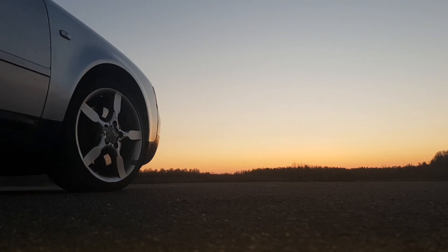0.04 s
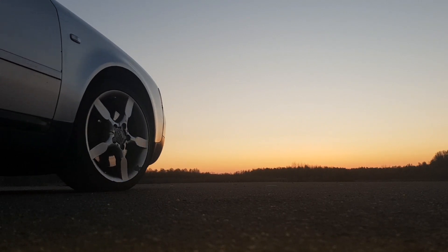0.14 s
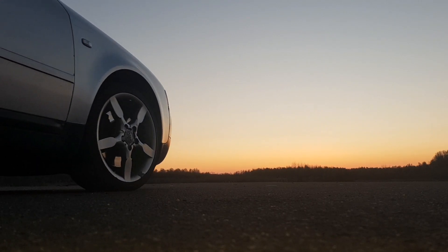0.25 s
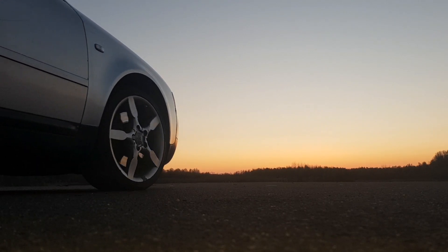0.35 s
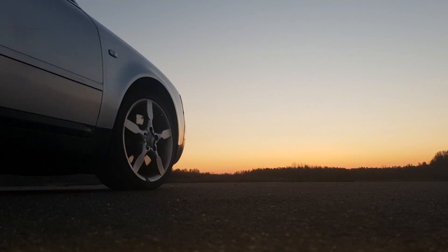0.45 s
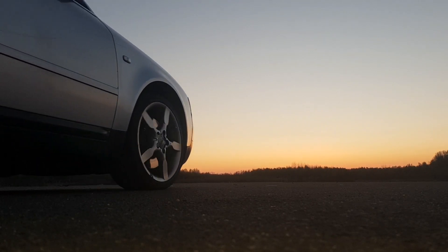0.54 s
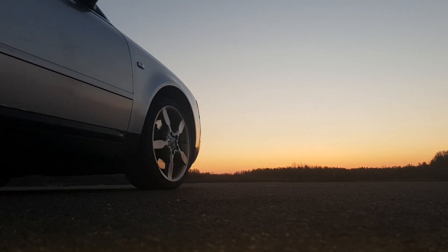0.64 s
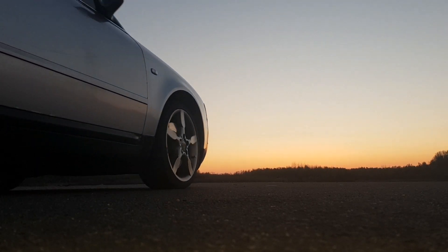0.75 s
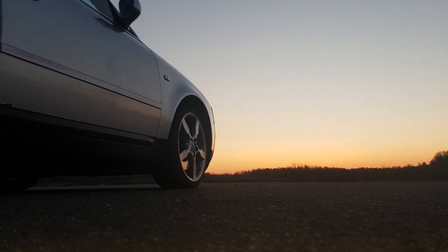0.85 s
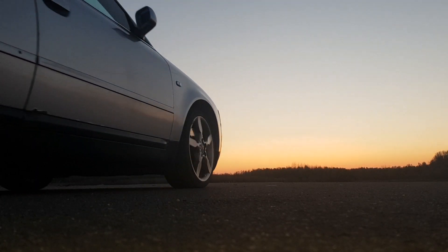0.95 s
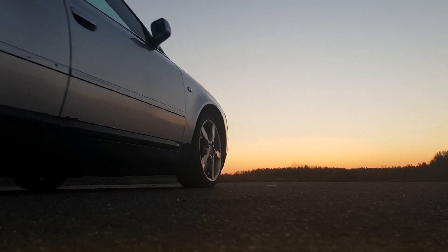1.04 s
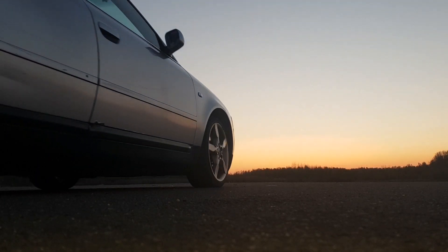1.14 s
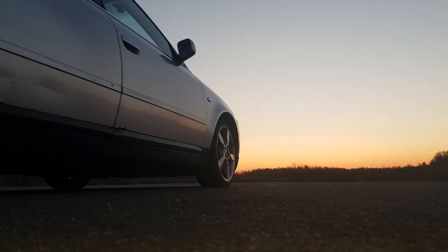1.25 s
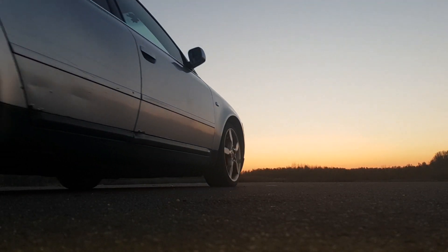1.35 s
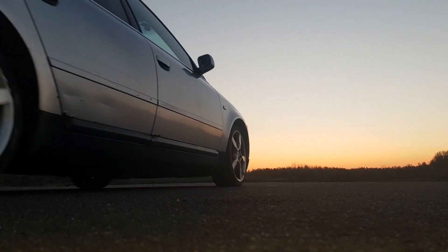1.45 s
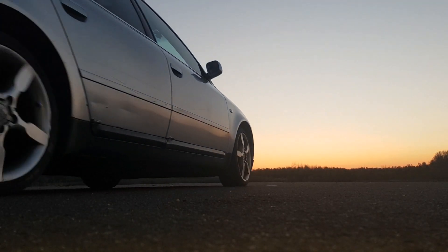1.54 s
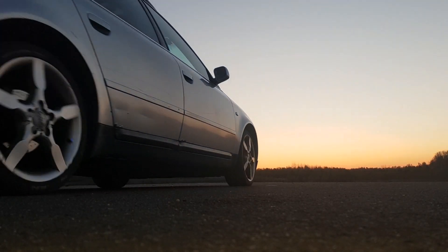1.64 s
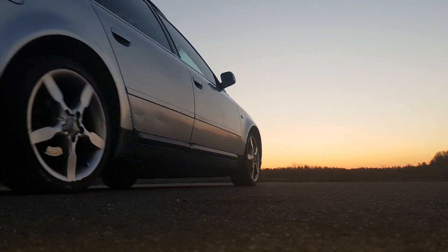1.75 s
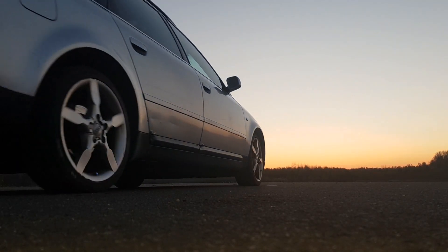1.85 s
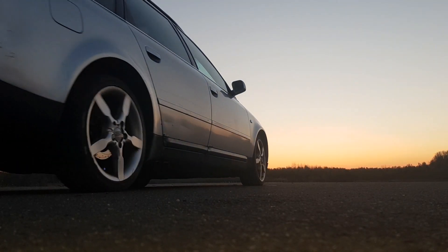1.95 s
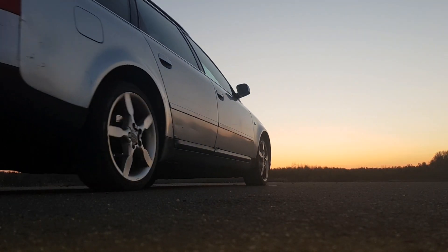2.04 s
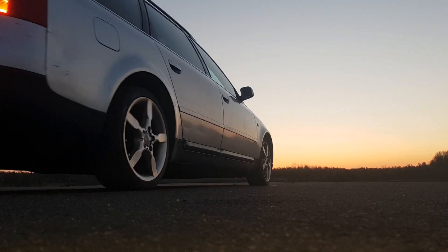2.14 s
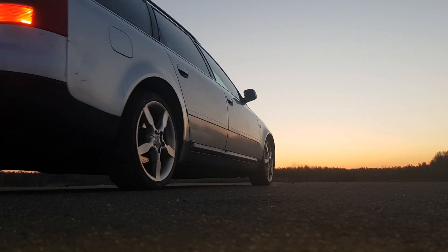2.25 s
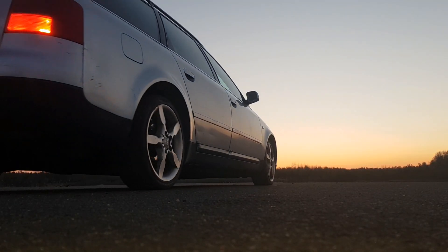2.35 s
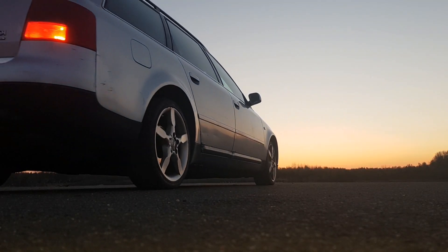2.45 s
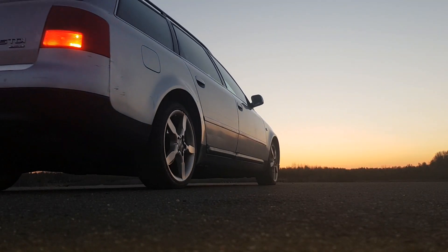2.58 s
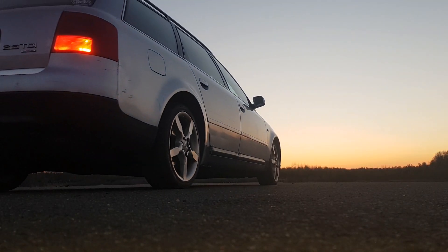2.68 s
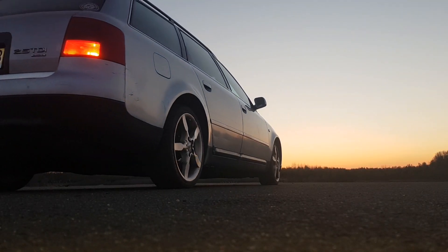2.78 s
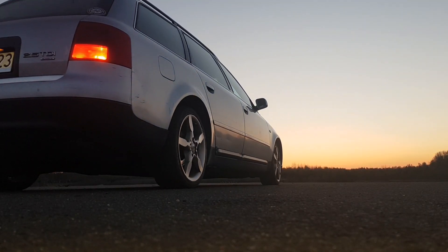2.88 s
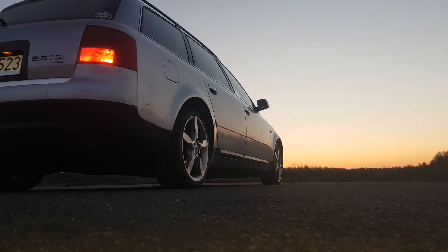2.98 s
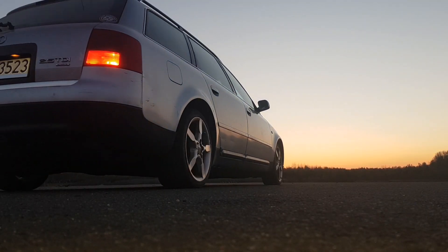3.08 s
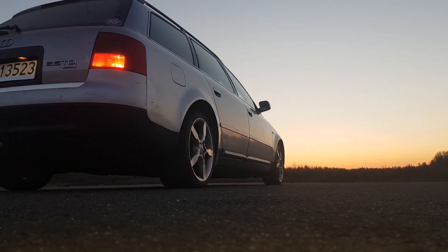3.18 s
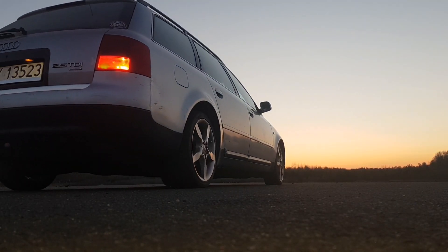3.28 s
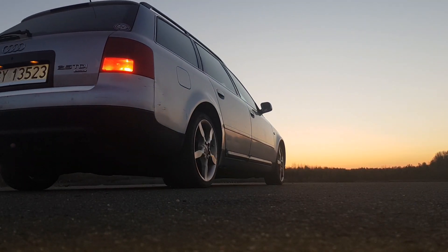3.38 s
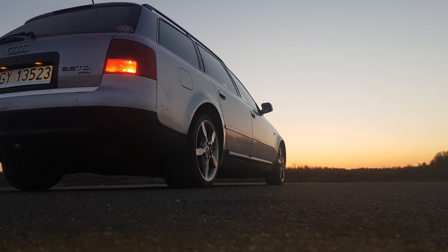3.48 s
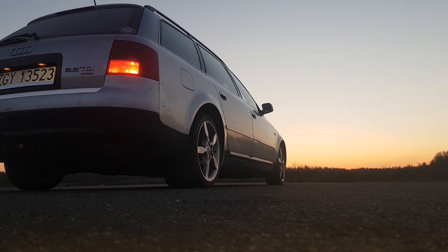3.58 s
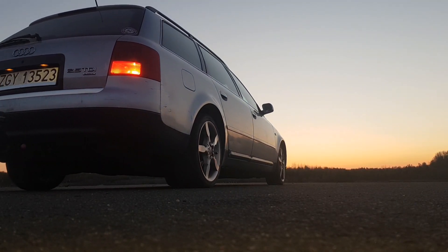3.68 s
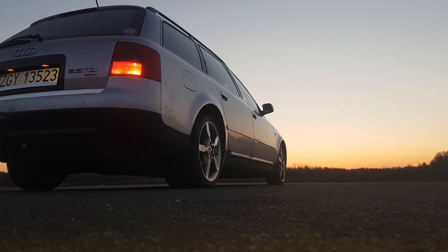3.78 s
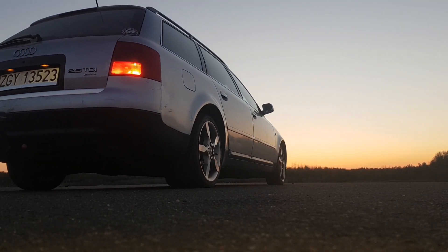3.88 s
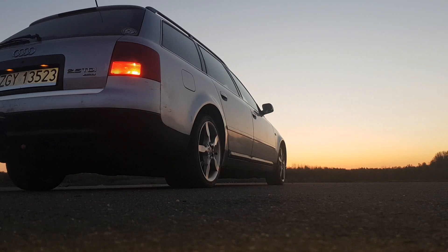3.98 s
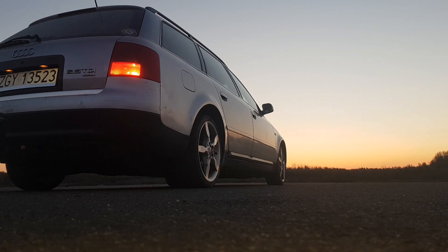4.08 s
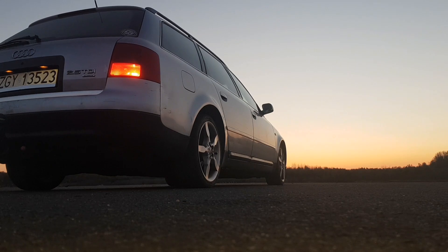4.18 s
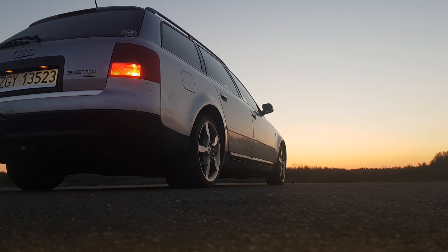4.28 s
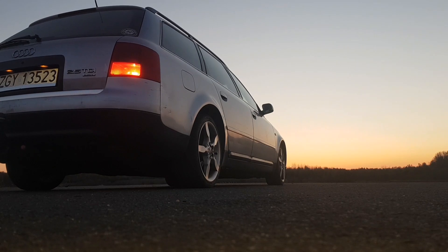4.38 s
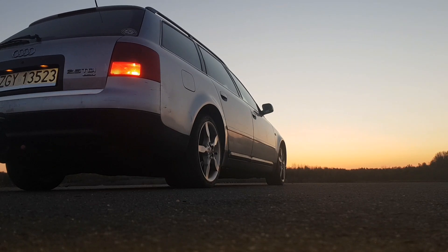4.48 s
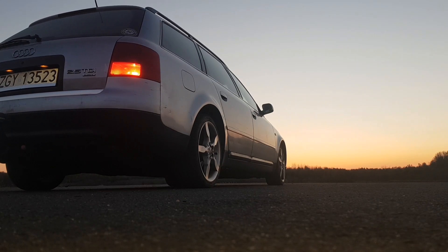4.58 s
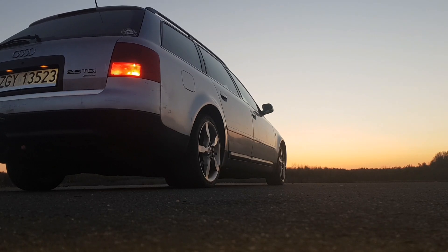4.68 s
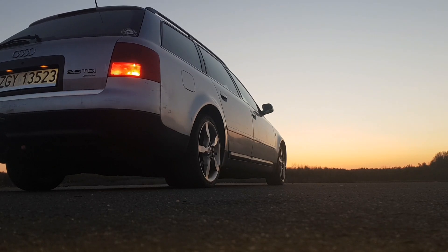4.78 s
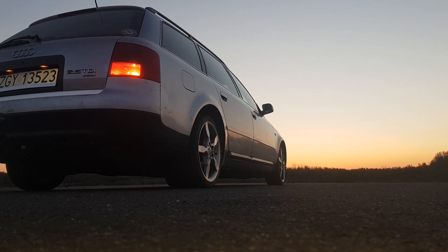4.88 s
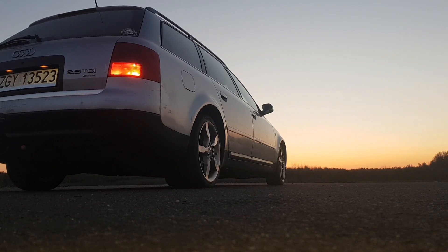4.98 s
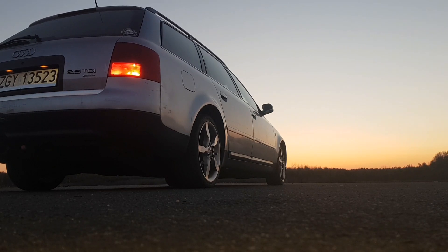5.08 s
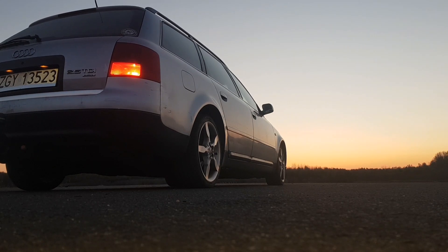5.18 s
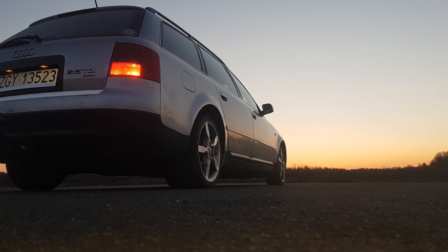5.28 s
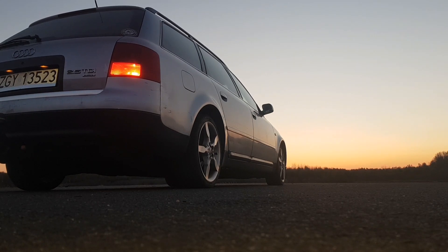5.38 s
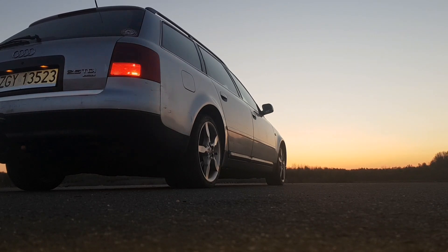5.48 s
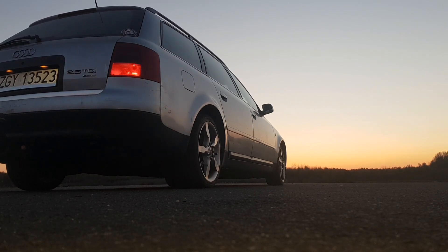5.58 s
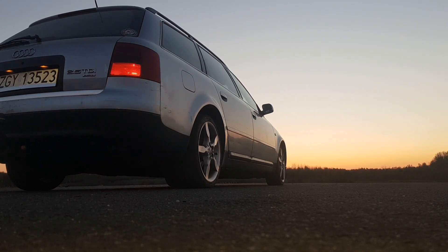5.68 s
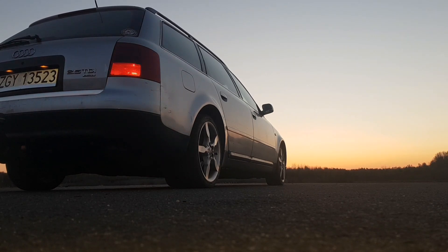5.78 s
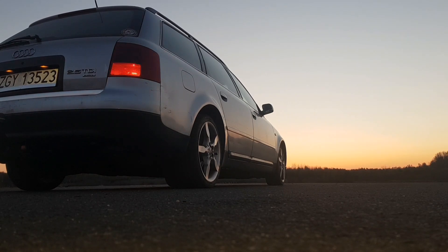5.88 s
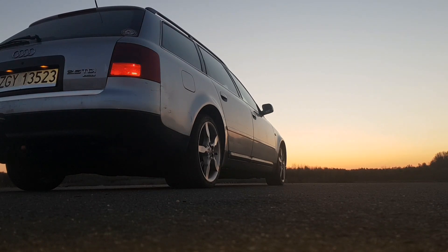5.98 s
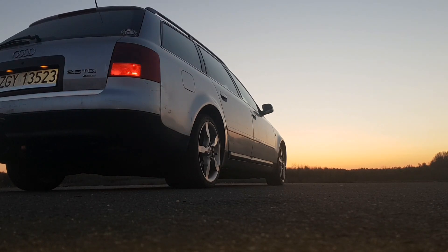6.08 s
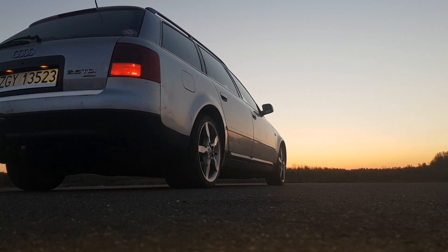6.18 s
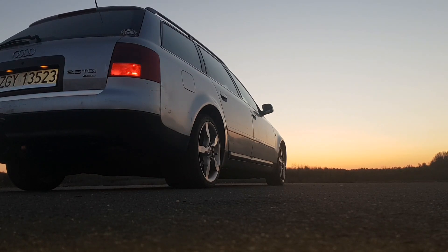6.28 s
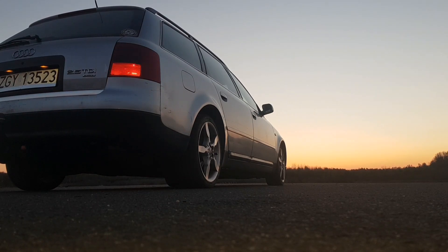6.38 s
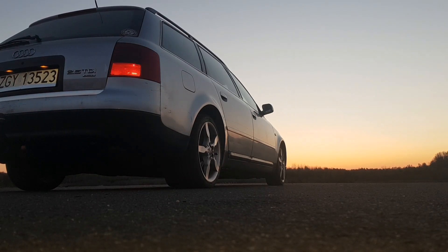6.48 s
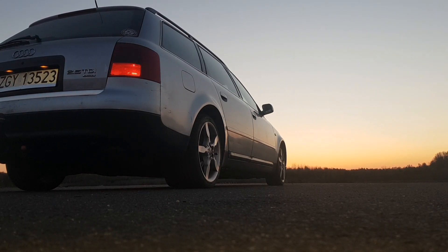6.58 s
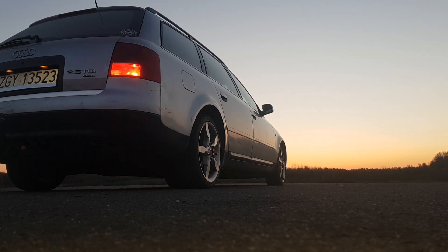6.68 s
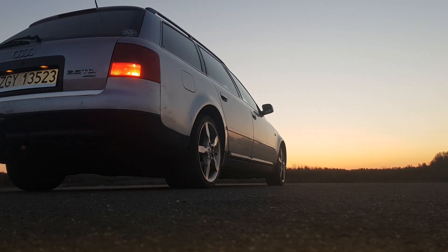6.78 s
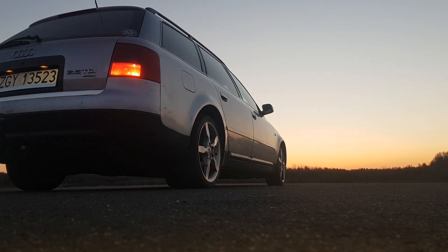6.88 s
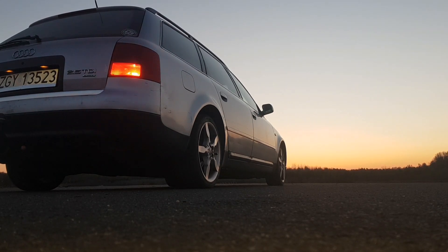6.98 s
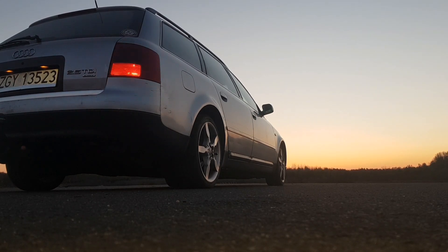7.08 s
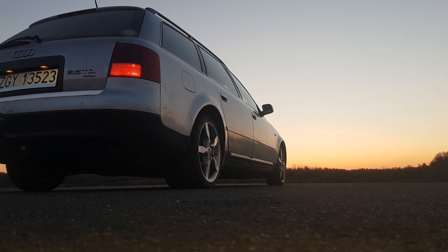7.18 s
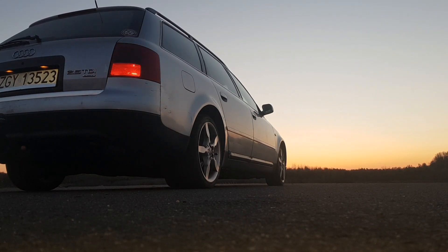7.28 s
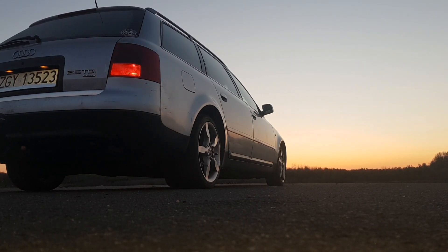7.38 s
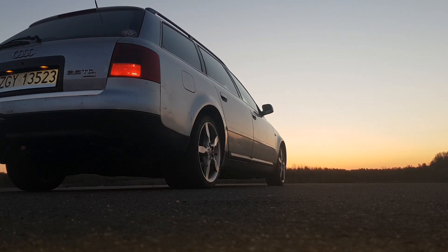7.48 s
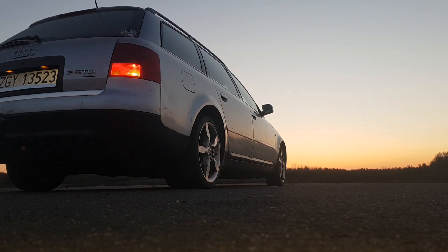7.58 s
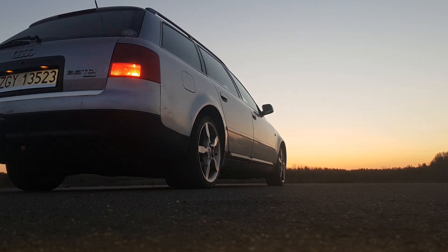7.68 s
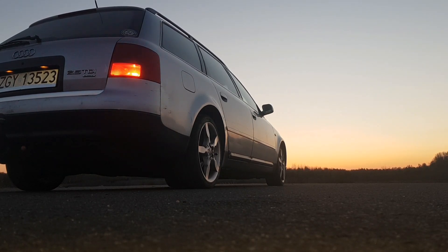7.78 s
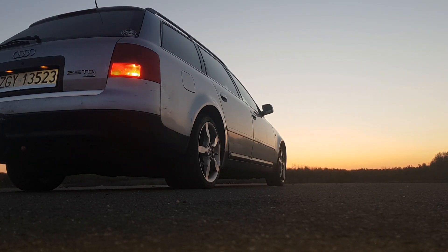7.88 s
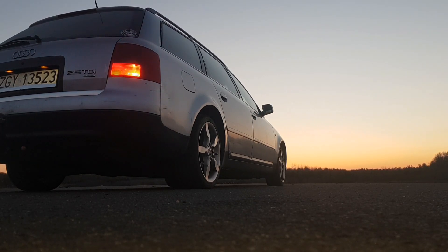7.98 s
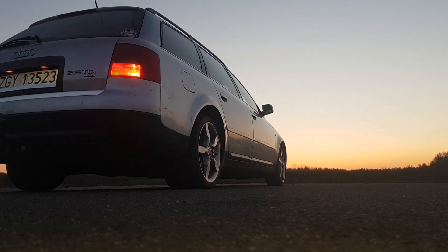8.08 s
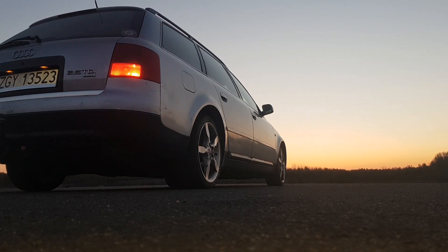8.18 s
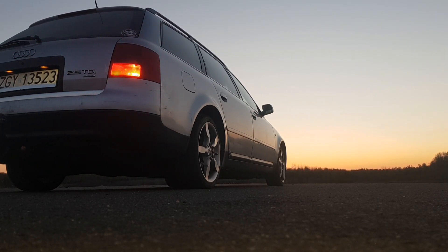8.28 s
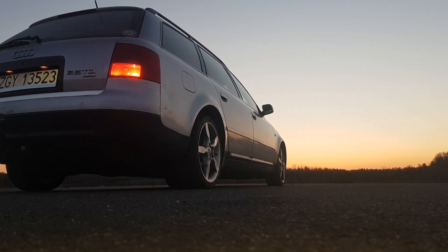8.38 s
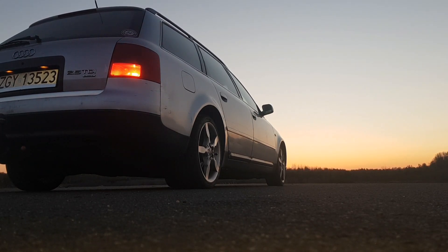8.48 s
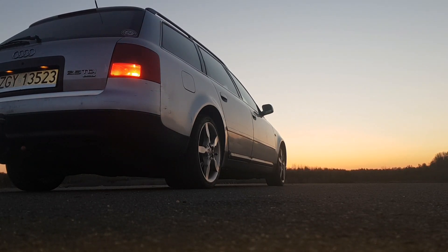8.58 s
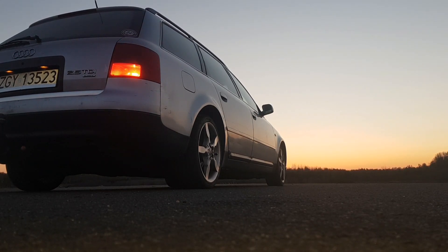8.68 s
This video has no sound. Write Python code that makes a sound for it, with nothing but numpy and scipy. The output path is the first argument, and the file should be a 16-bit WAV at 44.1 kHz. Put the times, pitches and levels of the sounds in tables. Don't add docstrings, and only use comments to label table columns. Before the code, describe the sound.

Outdoors on open tarmac, heard in stereo from a phone near the ground: a diesel engine under load drones loudly with hard clatter, thin whine and hissing tyres, then backs off and drops in pitch. A steady uneven idle follows, low exhaust throb with gas roar and rattling injectors, quieter as the car stops further off. One brief stumble, then a final rise in revs.

```python
import sys
import numpy as np
from scipy import signal
from scipy.fft import rfft, irfft, next_fast_len
from scipy.io import wavfile

SR = 44100
rng = np.random.default_rng(int(sys.argv[2]) if len(sys.argv) > 2 else 0)


def how_loud(loudness_db):
    steps = np.asarray(loudness_db, float) / 20
    return 10 ** steps


def master_out(mix):
    frames = np.transpose(np.atleast_2d(mix))
    ceiling = np.clip(frames, -1, 1)
    pcm = np.round(ceiling * 32767).astype(np.int16)
    wavfile.write(sys.argv[1], SR, pcm)


N = 385434
TIME = np.arange(N) / SR
SIZE = next_fast_len(N + SR)
HZ = np.maximum(np.arange(SIZE // 2 + 1) * SR / SIZE, 1)
SIDE = np.array([[1], [-1]])

# time in seconds, rate in firings per s.
CRANK = [(0, 54.13), (.3, 55.21), (.55, 54.51), (.88, 52.82), (1.22, 53.08), (1.6, 41.25), (1.75, 37.94),
         (2, 38.46), (2.45, 39.26), (3.6, 39.05), (6.4, 39.05), (7, 38.99), (8.43, 38.95), (8.65, 43.69),
         (8.74, 51)]
# idle strength in dB, idle pipe lag in ms, loaded strength in dB, loaded pipe lag in ms.
CYLINDERS = [(3.1, 6.14, 3.1, 7.26), (-0.6, 5.93, -6.1, 8.11), (0.7, 5.87, 2.0, 7.04),
             (-2.8, 5.59, -1.6, 7.7), (1.5, 5.41, 3.0, 7.07), (-3.9, 5.16, -4.9, 9.1)]
# centre in Hz, width in Hz, level in dB, polarity.
PIPE_IDLE = [(97.7, 44.9, -48, -1), (108, 11.02, -40, 1), (169.94, 10.5, -48, 1), (199.1, 6, -63, 1),
             (253, 13.4, -67.5, 1)]
PIPE_LOAD = [(97, 69.6, -47.5, -1), (101.3, 15.2, -37, 1), (173.3, 78, -49.5, 1), (203, 17, -49.5, -1),
             (265, 77, -61.5, -1)]
# frequency in Hz, level in dB per Hz.
ROAR_IDLE = [(120, -9), (210, 2.5), (227, -10.5), (358, -6), (456, -9), (736, -10), (875, -16.5),
             (1100, -15.5), (1430, -42.5), (2420, -120)]
ROAR_LOAD = [(160, -25), (280, -10), (298, -2.5), (384, -2), (464, -7), (574, -1.5), (702, -10.5),
             (1020, -8.5), (1200, -11.5), (1560, -45), (2640, -120)]
CLATTER_IDLE = [(530, -34.5), (900, -12), (1350, -5), (1460, -9.5), (1600, -10), (3820, -19.5),
                (5150, -19.5), (6000, -27.5), (7210, -28), (9000, -42.5), (11700, -64.5), (19800, -120)]
CLATTER_LOAD = [(650, -29.5), (1100, -18.5), (1290, -14), (1420, -1), (1820, 4.5), (2410, -1.5), (3240, -3),
                (4410, -9), (4910, -13.5), (7160, -16.5), (9000, -30.5), (11700, -69.5), (19800, -120)]
# frequency in Hz, level in dB per Hz.
HISS = [(2940, -42), (5000, -21), (7200, -6.5), (8920, -4.5), (10900, -2.5), (13100, -1), (14500, -26.5)]
EVEN = [(1000, 0), (10000, 0)]
# centre in Hz, width in Hz, dB.
BLOCK = [(247.7, 37, 5.5), (330.6, 78, 1.5), (475.4, 64, -4), (626, 77, -4.5), (740, 123, -3.5),
         (928, 120, -8), (1156, 70, -4.5), (1254, 120, -6), (1465, 64, -4), (1614, 126, -6.5),
         (1960, 140, -12)]
COVERS = [(1650, 160, -7), (2050, 250, -8.5), (2430, 290, -3.5), (3200, 180, -17), (4220, 420, -5),
          (5240, 360, -7), (6920, 560, -8), (4250, 70, -2), (6985, 53, -1)]
# start in seconds, peak in dB, ring in Hz.
KNOCKS = [
    (0.245, -20.5, 1400),
    (1.953, -28, 1550),
    (2.108, -28.5, 1500),
    (4.873, -30, 1340),
]
STONE = [
    (1.8, -44.5, 6000),
]
INJECTOR_RINGS = [(0.094, -31, 3380), (0.1357, -26, 3050), (0.462, -14.5, 3200), (0.553, -29, 3070),
                  (0.5904, -20, 3570), (0.93, -19.5, 2930), (1.117, -25.5, 3120), (1.953, -37, 3070),
                  (2.4196, -37.5, 3140), (2.5702, -35.5, 3200), (2.7237, -37.5, 3220), (2.877, -40, 3150)]
# frequency in Hz, likeness 0-1.
LIKENESS = [(60, 0.73), (130, 1), (290, 0.93), (620, 0.87), (1360, 0.73), (2970, 0.48), (6470, 0.18),
            (14100, 0.02)]
# frequency in Hz, left over right in dB.
LEAN = [(60, 4), (370, -0.5), (1250, 0), (4200, -0.5), (7700, -5), (10000, 22)]
# idle dB, then dB added at pulling revs, under load, and with the bay alongside.
ROAR_LAW = (-40, 6, 4.5, 4)
CLATTER_LAW = (-43.5, 2, 3.5, 9)
RATTLE_LAW = (-55.5, 4.5, 3.5, 7)
WHINE_LAW = (-51, -3, -30, 8)
FAN_LAW = (-95.5, 26.5, 1, -5)
PAN_LAW = (1.52, .2, 0.42, 0.67)
BAY_SHARE = (0.01, 0.4, 0.31, 0.2)
INJECTOR_DB = [-1, 5.5, -5, 5, -7.5, 4.5]

IDLE_RATE, PULL_RATE, STUMBLE_SAG = 39.05, 54, 1.47
STUMBLE_S, GOVERNOR_PERIOD_S, GOVERNOR_SETTLE_S = 5.14, .37, .2
LIFT_S, LIFT_FADE_S, PIPE_FADE_S, REFUEL_S, REFUEL_FADE_S, PICKUP_S = 1.168, .047, .11, 1.628, .14, 8.5
STOP_S = 3.75
LOAD_DB, LOAD_CLOSE_DB, BOOM_DB, BOOM_CLOSE_DB, PICKUP_DB = -5, 7, 5.5, -8.5, -13
IDLE_DB, IDLE_CLOSE_DB, IDLE_PICKUP_DB, OVERRUN_DB = -5.5, 6.5, 1.5, -9
MISFIRE_S, MISFIRE_LENGTH_S, MISFIRE_DB, CATCH_DB, CATCH_S = 5.21, .056, -4.5, 6, .025
PUMP_DB, PUMP_HOLD_S, PUMP_FALL_DB_S, PUMP_FLOOR_DB = -23.5, .13, 200, -36.5
WHINE_HZ, BELT_GRIP = 1349, .8
INJECT_AT, INJECT_ADVANCE = .55, .15
RING_HZ, RING_SPREAD_HZ, RING_DB, RING_SCATTER_DB = 3148, 130, 3.5, 2
BAY_LAG_REST, BAY_LAG_CLOSE = 1, -12
INTAKE_HZ, INTAKE_WIDTH_HZ, INTAKE_DB = 391, 80, -39
TYRES_DB, TYRES_DB_PER_DECADE = -62, 34


def exhaust(count, fired, chance, now):
    loaded, boom, idling, hum = fuelling(now)
    idle_size, idle_ms, load_size, load_ms = np.array(CYLINDERS)[np.arange(len(fired)) % 6].T
    at = (fired * SR).astype(int)
    idle_gain = idling[at] * how_loud(idle_size + .5 * chance[0])
    load_gain = loaded[at] * how_loud(load_size + .8 * chance[0])
    idle = pulses(fired + idle_ms / 1000, SR / 2 * idle_gain)
    load = pulses(fired + load_ms / 1000, SR / 2 * load_gain)
    out = through(idle, sum(np.sign(sign) * how_loud(db) * mode(hz, w) for hz, w, db, sign in PIPE_IDLE))
    for k, (hz, w, db, sign) in enumerate(PIPE_LOAD):
        drive = load * boom if k < 2 else load
        out += through(drive, np.sign(sign) * how_loud(db) * mode(hz, w))
    out += hum * np.sqrt(2) * np.sin(4 * np.pi * count)
    pipe_end = -HZ ** 2 / (32 ** 2 - HZ ** 2 + 1.4j * HZ * 32)
    silencer = 1 / (1 + (HZ / 500) ** 6)
    return through(out, pipe_end * silencer)


def fuelling(now):
    close = now[3]
    load = 1 - ramp(LIFT_S, PIPE_FADE_S)
    loaded = load ** 2 * how_loud(LOAD_DB + LOAD_CLOSE_DB * close)
    loaded += how_loud(PICKUP_DB) * ramp(PICKUP_S, .36)
    boom = how_loud(BOOM_DB + BOOM_CLOSE_DB * close)
    refuel = ramp(REFUEL_S, REFUEL_FADE_S)
    caught = TIME - MISFIRE_S - MISFIRE_LENGTH_S
    idle_db = IDLE_DB + IDLE_CLOSE_DB * close + IDLE_PICKUP_DB * ramp(PICKUP_S, .025)
    idle_db += OVERRUN_DB * (1 - refuel)
    idle_db += MISFIRE_DB * (TIME > MISFIRE_S) * (caught < 0)
    idle_db += CATCH_DB * (caught > 0) * np.exp(-abs(caught) / CATCH_S)
    idling = (1 - load) ** 4 * how_loud(idle_db)
    hum_db = PUMP_DB - PUMP_FALL_DB_S * np.maximum(TIME - LIFT_S - PUMP_HOLD_S, 0)
    hum = ramp(LIFT_S, .05) ** 2 * (1 - refuel) * how_loud(np.maximum(hum_db, PUMP_FLOOR_DB))
    return loaded, boom, idling, hum


def gas_roar(count, fired, now, near):
    slugs_db = 2 * rng.standard_normal(len(fired) + 7)
    rush = noise(ROAR_IDLE, ROAR_LOAD, near) * puff(count, slugs_db, .9, .23, .17)
    return how_loud(law(ROAR_LAW, now)) * rush * flicker(5.5, .47)


def engine_bay(count, fired, chance, now, near):
    uneven_db = np.resize([0., 1.5, 1., .5, -.5, -1.], len(fired) + 7)
    uneven_db = uneven_db + .8 * rng.standard_normal(len(fired) + 7)
    beats = block_knock(fired, chance, uneven_db) + valve_clatter(count, uneven_db, near)
    out = how_loud(law(CLATTER_LAW, now)) * beats
    out += belt_whine(count, now) + injector_rattle(count, fired, now)
    add_hits(out, KNOCKS, 0, .08, .005)
    add_hits(out, STONE, 0, 4.0, .003)
    add_hits(out, INJECTOR_RINGS, 0, .05, .005)
    add_hits(out, injections(count, fired, now), RING_DB, .05, .004)
    return out


def block_knock(fired, chance, uneven_db):
    strikes = pulses(fired + .012 + .00003 * chance[1], how_loud(uneven_db[6:-1]))
    block = sum(how_loud(db) * mode(hz, w) ** 2 for hz, w, db in BLOCK)
    return unit(through(strikes, block)) * how_loud(.5)


def valve_clatter(count, uneven_db, near):
    covers = 1 + sum(how_loud(db) * abs(mode(hz, w)) ** 2 for hz, w, db in COVERS)
    clatter = noise(CLATTER_IDLE, CLATTER_LOAD, near, covers)
    return clatter * puff(count, uneven_db, .29, .69, .77) * flicker(7.6, .45)


def belt_whine(count, now):
    belt_speed = 1 + BELT_GRIP * now[1] * (PULL_RATE / IDLE_RATE - 1)
    turns = np.cumsum(WHINE_HZ * belt_speed * flicker(60, .007)) / SR
    throb = 1 + .95 * np.cos(2 * np.pi * (count - .42))
    whine = throb * np.sin(2 * np.pi * turns) + how_loud(-14) * np.sin(2 * np.pi * 1.757 * turns)
    return how_loud(law(WHINE_LAW, now)) * np.sqrt(2) * whine


def injector_rattle(count, fired, now):
    rattle = 0
    for hz, w, db in [(3200, 800, -3), (4290, 720, -6), (5280, 1600, -12)]:
        force_db = 3 * rng.standard_normal(len(fired) + 7)
        burst = puff(count, force_db, INJECT_AT - INJECT_ADVANCE * now[2], .15, .7)
        rattle = rattle + how_loud(db) * burst * noise(EVEN, EVEN, 0, mode(hz, w) ** 2)
    return how_loud(law(RATTLE_LAW, now)) * rattle


def injections(count, fired, now):
    moment = count - INJECT_AT + INJECT_ADVANCE * now[2]
    seconds = np.interp(np.arange(len(fired) - 1), moment, TIME)
    force, pitch = rng.random((len(seconds), 2)).T
    db = law(RATTLE_LAW, now)[(seconds * SR).astype(int)] + np.resize(INJECTOR_DB, len(seconds))
    db = db - RING_SCATTER_DB * np.log(force)
    return zip(seconds, db, RING_HZ + RING_SPREAD_HZ * 2 * (pitch * 2 - 1))


def add_hits(out, hits, gain_db, crack, decay_s):
    age = np.arange(1300) / SR
    envelope = np.exp(-age / decay_s) * (1 - np.exp(-age / .0003))
    for s, db, hz in hits:
        front = crack * rng.standard_normal(len(age)) * np.exp(-age / .0011)
        hit = how_loud(db + gain_db) * (np.sin(2 * np.pi * hz * age) + front) * envelope
        at = int(s * SR)
        out[:, at:at + len(age)] += hit[:N - at]


def intake():
    drone = noise(EVEN, EVEN, 0, mode(INTAKE_HZ, INTAKE_WIDTH_HZ) ** 2)
    return how_loud(INTAKE_DB) * ramp(LIFT_S, PIPE_FADE_S) * (1 - ramp(REFUEL_S, .25)) * drone


def fan_and_tyres(now):
    tyres = how_loud(TYRES_DB) * now[3] ** (TYRES_DB_PER_DECADE / 40)
    return (how_loud(law(FAN_LAW, now)) + tyres) * noise(HISS, HISS, 0) * flicker(10.8, 1.4)


def crank():
    seconds, rate = np.transpose(CRANK)
    age = np.maximum(TIME - STUMBLE_S, 0)
    hunt = np.sin(2 * np.pi * age / GOVERNOR_PERIOD_S) * np.exp(-age / GOVERNOR_SETTLE_S)
    return np.interp(TIME, seconds, rate) - STUMBLE_SAG * hunt


def state(rate):
    revs = (rate - IDLE_RATE) / (PULL_RATE - IDLE_RATE)
    load = 1 - ramp(LIFT_S, LIFT_FADE_S)
    close = (1 - ramp(0, STOP_S)) ** 2
    return np.array([np.ones(N), revs, load, close])


def law(row, now):
    return np.array(row) @ now


def ramp(start_s, fade_s):
    return np.clip((TIME - start_s) / fade_s, 0, 1)


def puff(count, cylinder_db, delay, decay, share):
    late = count - delay + 6
    age = late % 1
    jump = how_loud(cylinder_db[late.astype(int)]) * np.sqrt(age / decay) * np.exp(-age / decay)
    return unit(1 - share + share * jump * np.e)


def flicker(rate, db):
    steps = rng.standard_normal(int(N / SR * rate) + 2)
    return how_loud(db * np.interp(TIME * rate, np.arange(len(steps)), steps))


def noise(idle, load, near, colour=1):
    alike = np.clip(on_hz(LIKENESS), 0, 1)
    mid, side = rfft(rng.standard_normal((2, SIZE)))
    pair = mid * np.sqrt(1 + alike) + side * np.sqrt(1 - alike) * SIDE
    idle_noise = unit(irfft(pair * colour * how_loud(on_hz(idle)), SIZE)[:, :N])
    load_noise = unit(irfft(pair * how_loud(on_hz(load)), SIZE)[:, :N])
    return (1 - near) * idle_noise + near * load_noise


def pulses(seconds, size):
    place = np.clip(seconds * SR, 0, N - 2)
    whole = place.astype(int)
    part = place - whole
    return np.bincount(whole, size * (1 - part), N) + np.bincount(whole + 1, size * part, N)


def mode(hz, width_hz):
    return 1j * HZ * width_hz / (hz ** 2 - HZ ** 2 + 1j * HZ * width_hz)


def on_hz(table):
    hz, value = np.transpose(table)
    return np.interp(np.log(HZ), np.log(hz), value)


def through(x, response):
    return irfft(rfft(x, SIZE) * response, SIZE)[..., :N]


def unit(x):
    return x / np.sqrt(np.mean(x ** 2))


def scene():
    rate = crank()
    now = state(rate)
    count = np.cumsum(rate) / SR
    fired = np.interp(np.arange(int(count[-1]) + 1), count, TIME)
    chance = rng.standard_normal((len(fired), 2)).T
    near = np.clip(law(BAY_SHARE, now), 0, 1)
    pipe = exhaust(count, fired, chance, now) * how_loud(SIDE * law(PAN_LAW, now) / 2)
    upper = gas_roar(count, fired, now, near)
    upper += engine_bay(count, fired, chance, now, near)
    upper += intake() + fan_and_tyres(now)
    upper = through(upper, how_loud(SIDE * on_hz(LEAN) / 2))
    heard = np.arange(N) - BAY_LAG_REST - BAY_LAG_CLOSE * now[3]
    upper[0] = np.interp(heard, np.arange(N), upper[0])
    return pipe + upper


def low_pass(x):
    return signal.sosfilt(signal.butter(12, 14720, fs=SR, output="sos"), x)


def record(dry):
    return low_pass(dry)


dry = scene()
out = record(dry)
master_out(out)
```